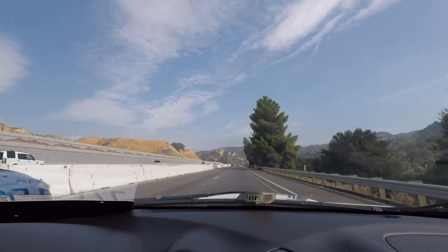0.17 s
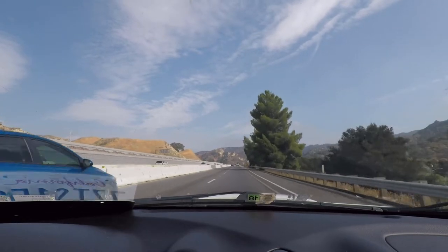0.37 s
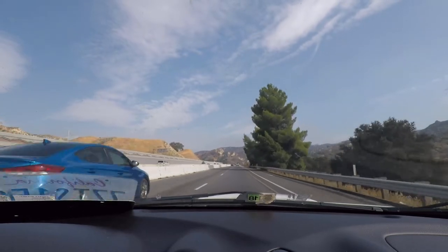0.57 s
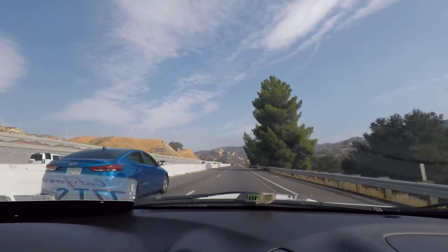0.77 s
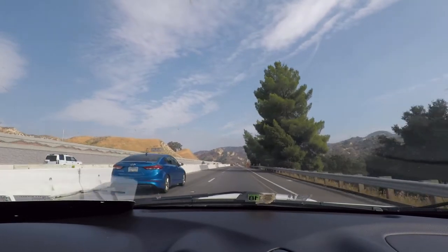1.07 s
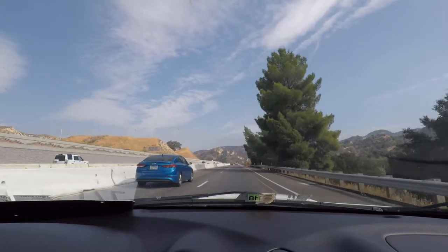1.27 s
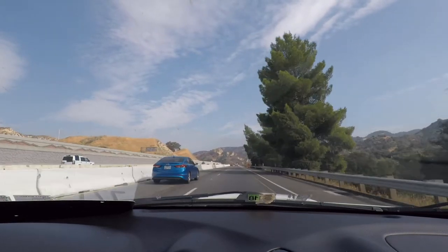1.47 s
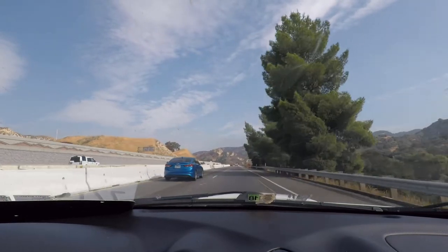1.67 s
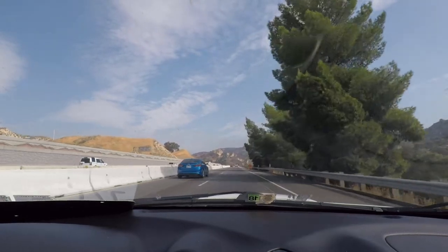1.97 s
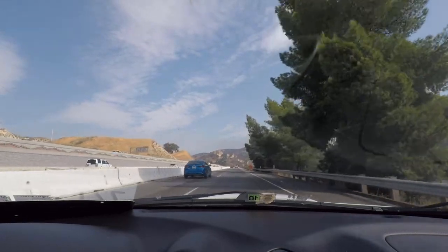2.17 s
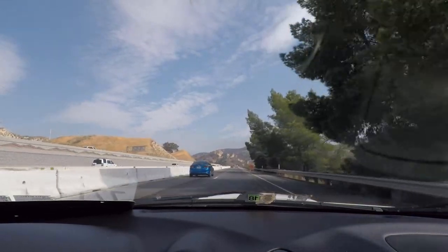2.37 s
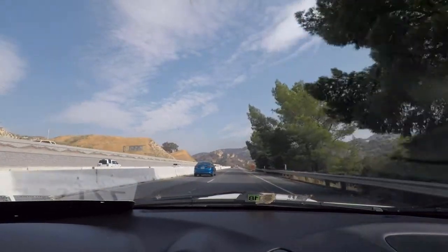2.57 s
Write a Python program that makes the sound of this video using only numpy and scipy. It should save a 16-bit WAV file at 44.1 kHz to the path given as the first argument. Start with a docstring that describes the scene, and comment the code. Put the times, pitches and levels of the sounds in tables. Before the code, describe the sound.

Dragging exhaust rasps and rings in rapid, uneven bursts beneath a car, with low engine drone inside

```python
"""Inside a car on a highway, 2.7 seconds: from the start, sine waves make the engine's drone, and filtered
noise makes the rumble and roar of road and wind, with hollow tones on the right. A loose exhaust pipe
drags on the asphalt: each touch is a burst of random clicks that rasps and rings the steel, and the
ringing carries over the gaps. Dull knocks, fading sine waves, join from 0.4 s. From 0.9 to 1.5 s
a low boom, a gliding sine wave that is only faint before, swells, climbs in pitch and fades."""
import sys
import numpy as np
from scipy import signal
from scipy.fft import rfft, irfft
from scipy.io import wavfile
from scipy.ndimage import uniform_filter1d, minimum_filter1d

SR = 44100
rng = np.random.default_rng(int(sys.argv[2]) if len(sys.argv) > 2 else 0)


def unload_wav(signal):
    """Save mono or channel-first audio to the path in sys.argv[1] as 16-bit WAV at rate SR, clipped to [-1, 1]."""
    wavfile.write(
        sys.argv[1],
        SR,
        np.round(np.clip(np.atleast_2d(signal).T, -1, 1) * 32767).astype(np.int16),
    )


N = 120834
TIME = np.arange(N) / SR  # seconds
FREQS = np.maximum(np.fft.rfftfreq(N, 1 / SR), 1)  # Hz


def from_db(db):
    """Turn decibels into a gain."""
    return 10 ** (np.asarray(db) / 20)


def rms_one(x):
    """Scale a signal to an average power of 1."""
    return x / np.sqrt(np.mean(x ** 2) + 1e-20)


def in_time(rows):
    """Join the table's columns by straight lines in time."""
    seconds, *columns = np.transpose(rows)
    return [np.interp(TIME, seconds, column) for column in columns]


def in_frequency(rows):
    """Join the table's columns by straight lines over log frequency."""
    hz, *columns = np.transpose(rows)
    return [np.interp(np.log(FREQS), np.log(hz), column) for column in columns]


def drift(rate_hz):
    """Smooth random wandering of rms 1; a higher rate wanders faster."""
    step = 40  # samples between the random values
    r = np.exp(-2 * np.pi * rate_hz * step / SR)
    noise = rng.standard_normal(N // step + 2002)
    slow = signal.lfilter([1], [1, -2 * r, r * r], noise)[2000:]  # skip the filter's start-up
    return np.interp(np.arange(N) / step, np.arange(len(slow)), rms_one(slow))


def pan(db):
    """Left and right gains of equal total power; positive dB leans left."""
    gains = from_db(np.vstack([db / 2, -db / 2]))
    return gains / np.sqrt(np.mean(gains ** 2, axis=0))


def widen(mid, side, share):
    """Make left and right from a common and an opposed part."""
    return np.array([mid + share * side, mid - share * side]) / np.sqrt(1 + share ** 2)


def decay_per_sample(t60_s):
    """Factor by which a ring shrinks each sample, to fall 60 dB in t60_s seconds."""
    return np.exp(-np.log(1000) / (t60_s * SR))


def resonate(x, hz, t60_s):
    """Pass sound through one resonance that has a gain of 1 at its top."""
    r = decay_per_sample(t60_s)
    feed = np.array([1, 0, -1]) * (1 - r * r) / 2
    return signal.lfilter(feed, [1, -2 * r * np.cos(2 * np.pi * hz / SR), r * r], x)


MUFFLE_HZ = 1100


def muffle(x):
    """The car's body keeps the treble of low sounds out."""
    lowpass = signal.butter(2, MUFFLE_HZ, fs=SR, output="sos")
    return signal.sosfilt(lowpass, x + 1e-18)


ATTACK_S, RELEASE_S = 0.0037, 0.011
GRAZE_DB = -20  # light force that is always there, also between touches
CHATTER_DB, CHATTER_RATE_HZ = 2.5, 330
# The pipe touches the road. Each row: start in seconds, length in seconds,
# force in dB before the chatter, extra treble of the ringing in dB.
SCRAPES = [(0.0, 0.0043, 1, -1.5), (0.025, .042, 2, -0.5), (0.086, 0.027, 5.5, -1.5),
           (0.166, 0.041, -2.5, 2.5), (0.23, 0.022, -1, 1.5), (0.353, 0.037, -4.5, -3.5),
           (0.418, 0.024, -3.5, -1.5), (0.473, 0.018, -2.5, -1.5), (0.53, 0.045, -1.5, -2.5),
           (0.58, 0.027, -1, -0.5), (0.754, 0.015, -6, -8.5), (0.78, 0.027, -9.5, -6),
           (0.82, 0.034, -1.5, -1.5), (0.861, 0.083, -4.5, -2.5), (0.925, .03, -6, -3.5),
           (0.957, 0.044, -4, 0), (1.03, 0.027, -6.5, 5.5), (1.07, 0.044, 1, -5), (1.118, 0.035, -2, -2.5),
           (1.157, 0.04, -2.5, -4), (1.223, 0.024, -5, -4.5), (1.283, 0.041, -5.5, -4),
           (1.407, 0.029, -1.5, -0.5), (1.443, 0.047, 2.5, -1.5), (1.588, 0.021, 5, 0),
           (1.644, 0.033, 5.5, -1.5), (1.752, 0.028, -0.5, -6), (1.777, 0.038, -6, 5),
           (1.826, 0.042, -3, -2.5), (1.879, 0.014, 4.5, -1.5), (1.978, 0.045, 0, 0.5),
           (2.022, 0.0048, -6, 11), (2.065, 0.053, -2, 0.5), (2.125, 0.0081, 0, -1), (2.144, 0.034, -5, 3),
           (2.197, 0.038, 0, 0.5), (2.242, 0.048, -7.5, 3.5), (2.294, 0.015, -7.5, -0.5),
           (2.336, 0.021, -0.5, -3), (2.469, 0.014, -4, -3), (2.516, 0.031, -6.5, -3.5),
           (2.622, 0.029, 1.5, -0.5), (2.671, 0.01, 1.5, -0.5)]


def contact():
    """Force of the pipe on the road, and the extra treble of the touches weighted by force."""
    force = np.full(N, from_db(GRAZE_DB))
    treble = np.zeros(N)
    for start, length, db, treble_db in SCRAPES:
        age = TIME - start
        attack = np.clip(age / ATTACK_S, 0, 1)
        release = np.exp(-np.maximum(age - length, 0) / RELEASE_S)
        touch = from_db(db) * attack * release
        force = force + touch
        treble = treble + touch * treble_db
    chatter = from_db(CHATTER_DB * (drift(CHATTER_RATE_HZ) - 1.0))
    return force * chatter, treble / force


GRIT_PER_S, GRIT_SPREAD_DB = 3000, 4.7


def grit():
    """Tiny impacts of the asphalt's stones on the steel: clicks of random size, sign and moment."""
    size_db = GRIT_SPREAD_DB * np.minimum(rng.exponential(1, N), 4)
    clicks = from_db(size_db) * rng.choice([-1, 1], N)
    return rms_one(clicks * (rng.random(N) < GRIT_PER_S / SR))


RASP_DB = 45.5  # added to the whole table below
RASP_T60_S, RASP_DIRECT = 0.013, 0.4  # short ring, and share of bare contact noise
COLOUR_DB, COLOUR_OCTAVES, COLOUR_RATE_HZ = 5, 0.7, 9  # wandering bands and how far apart they repeat
# Tone of the bare contact. Each row: frequency in Hz, relative level in dB.
RASP = [(600, -82), (1100, -94.5), (1500, -76), (1900, -83.5), (2700, -83.5), (3100, -86), (4200, -83),
        (5300, -87.5), (6200, -86.5), (7400, -93), (8600, -110), (12800, -120), (15500, -145)]


def rasp(drive):
    """Contact noise and its short ring in many weak steel modes; its colour shifts as the pipe rolls."""
    # fading noise stands for the crowd of modes, different on each side
    crowd = rng.standard_normal((2, N)) * from_db(-60 * TIME / RASP_T60_S)
    response = RASP_DIRECT + rfft(crowd / np.linalg.norm(crowd[0]))
    spectrum = rfft(drive) * response * from_db(RASP_DB + in_frequency(RASP)[0])
    out = 0
    for shift in np.linspace(0, 2 * np.pi, 3, endpoint=False):
        # three interleaved sets of bands that together add up to the whole
        bands = (1 + np.cos(2 * np.pi * np.log2(FREQS) / COLOUR_OCTAVES + shift)) / 3
        colour = rms_one(from_db(COLOUR_DB * drift(COLOUR_RATE_HZ)))
        out = out + irfft(spectrum * bands, N) * colour
    return out


RING_STEADINESS = 0.72  # 0 leaves the swing as it falls, 1 holds it at what the force can sustain
MODE_PHASE_RAD = 1.19  # phase between left and right


def ring_mode(stones, force, hz, t60_s):
    """One pipe mode, fed by grit near its pitch; friction keeps its swing near what the force sustains."""
    # run in for half the length first, so that it already rings at the start
    lead_force = np.full(N - N // 2, np.sqrt(np.mean(force ** 2)))
    force = np.concatenate([lead_force, force])
    stones = np.tile(stones, 2)[N // 2:]
    near_pitch = signal.butter(2, [hz / 1.15, hz * 1.15], "band", fs=SR, output="sos")
    push = signal.sosfilt(near_pitch, stones * force)

    r = decay_per_sample(t60_s)
    feed = 2 * (1 - r)
    swing = signal.lfilter([feed], [1, -r * np.exp(2j * np.pi * hz / SR)], push)[-N:]
    sustained = signal.lfilter([feed ** 2], [1, -r * r], force ** 2)[-N:]
    goal, power = uniform_filter1d(np.array([sustained, np.abs(swing) ** 2]), size=1800, axis=1)
    swing = swing * np.sqrt(np.abs(goal) / (np.abs(power) + 1e-20)) ** RING_STEADINESS

    offset = MODE_PHASE_RAD * rng.choice([-1, 1]) * np.array([[.5], [-.5]])
    phase = 2 * np.pi * rng.random() + offset
    return np.real(swing * np.exp(1j * phase))


RING_DB = 48.5  # added to every mode
MODE_WANDER_DB, MODE_WANDER_RATE_HZ = 3, 9
# extra treble is full this far above the pivot, and reversed as far below it
TREBLE_PIVOT_HZ, TREBLE_OCTAVES = 4240, 0.21
SWELL_WIDTH_HZ = 200  # a swell reaches modes closer than this
# Strong rings swell and fade. Each row: centre in Hz, then a curve of points,
# each point: time in seconds, level change in dB.
RING_SWELLS = [(2620, [(0, 6.5), (.5, 0), (1.1, -2), (1.33, 2.5), (1.6, 0), (2.5, -3)]), (3520, [(0, 4.5),
               (.55, -5.5), (.88, 4), (1.55, -4), (1.9, 9.5), (2.05, -0.5), (2.5, 5)])]
# The ringing tones of the steel pipe. Each row: frequency in Hz, relative level in dB,
# time to fade by 60 dB in seconds, left minus right in dB.
PIPE_MODES = [(1410, -66, .22, -5), (1647, -67, .28, 1), (2567, -70.5, .6, -3), (2643, -62, .6, 1),
              (3520, -71, .22, -3), (3811, -73.5, .15, -1), (3940, -70, .22, -1), (4139, -70, .22, 1),
              (4220, -70.5, .14, 2), (4694, -66, .28, -2), (4914, -74, .15, 4), (4979, -66.5, .2, 5),
              (5485, -76, .13, 8), (5770, -78, .07, 7), (6115, -77, .06, 3), (6573, -74.5, .17, -3),
              (6765, -76, .15, -1), (7132, -76.5, .15, 2), (7262, -78, .13, 7), (7816, -87, .04, 0),
              (9000, -90, .06, -3), (9750, -92.5, .06, 5), (10454, -97, .06, -4), (11181, -98, .06, -3)]


def pipe_ringing(stones, force, treble_db):
    """The steel pipe rings in its own tones, each wandering in how strongly the grit drives it."""
    out = 0
    for hz, db, t60_s, pan_db in PIPE_MODES:
        tilt = np.clip(np.log2(hz / TREBLE_PIVOT_HZ) / TREBLE_OCTAVES, -1, 1)
        swell_db = 0
        for centre_hz, curve in RING_SWELLS:
            if abs(hz - centre_hz) < SWELL_WIDTH_HZ:
                swell_db = swell_db + in_time(curve)[0]
        wander = rms_one(from_db(MODE_WANDER_DB * drift(MODE_WANDER_RATE_HZ)))
        coupling = wander * from_db(RING_DB + db + swell_db + tilt * treble_db)
        out = out + pan(pan_db) * ring_mode(stones, force * coupling, hz, t60_s)
    return out


SCRAPE_WIDTH = 0.18  # share of the rasp's grit that is opposed in left and right


def exhaust():
    """Grit under the contact force rasps on the pipe and makes it ring."""
    force, treble_db = contact()
    stones = grit()
    scrape = rasp(force * widen(stones, grit(), SCRAPE_WIDTH))
    return scrape + pipe_ringing(stones, force, treble_db)


ENGINE_WAVER_DB, ENGINE_WAVER_RATE_HZ = 1.5, 5.2
ENGINE_PAN_DB = -1.2  # left minus right
# Engine speed. Each row: time in seconds, firing rate in Hz.
FIRING = [(0, 67.86), (1.3, 65.96), (2.74, 66.17)]
# Engine loudness. Each row: time in seconds, level in dB.
ENGINE = [(0, -13.5), (.1, -11.5), (.5, -13.5), (.8, -15.5), (1.03, -16.5), (1.16, -23.5), (1.26, -15),
          (1.42, -14.5), (1.55, -11), (1.8, -9.5), (2.2, -11.5), (2.5, -14), (2.74, -11)]
# The engine's tones. Each row: multiple of the firing rate, relative level in dB.
ENGINE_ORDERS = [(1, -10), (2, 0), (3, -14), (4, -28.5), (5, -27.5), (6, -24.5)]


def engine():
    """Sine waves at multiples of the firing rate; all but the second also waver on their own."""
    firing_hz, level_db = in_time(FIRING) + in_time(ENGINE)
    turns = np.cumsum(firing_hz) / SR  # firings so far
    out = 0
    for order, db in ENGINE_ORDERS:
        waver_db = 0 if order == 2 else ENGINE_WAVER_DB
        level = from_db(db + waver_db * drift(ENGINE_WAVER_RATE_HZ))
        out = out + level * np.sin(2 * np.pi * (order * turns + rng.random()))
    return pan(ENGINE_PAN_DB) * np.sqrt(2) * from_db(level_db) * out


ROAR_ABOVE_HZ = 130  # rumble below, roar above
# Tone of road and wind in the cabin, before the level changes.
# Each row: frequency in Hz, level in dB per Hz.
ROAD = [(12, -57.5), (22, -37.5), (30, -28.5), (44, -29), (58, -42), (80, -43), (160, -44), (200, -52),
        (255, -47.5), (350, -49.5), (470, -56), (560, -50.5), (630, -59), (710, -68), (1000, -71.5),
        (1250, -77.5), (3000, -93.5), (6000, -108), (9000, -128), (15500, -150)]
# Left against right. Each row: frequency in Hz, share of opposed sound, left minus right in dB.
CABIN_IMAGE = [(29.8, 0.03, 1.5), (77, 0.025, -4), (300, 0.69, -1), (467, 0.42, 0), (617, 0.23, -12.5),
               (850, 1, -11.5), (1210, 1, -2.5), (2200, 0.49, 1)]
# Level changes. Each row: time in seconds, tyre roar in dB, deep rumble in dB.
ROAR = [(0, 5.5, 0), (.2, 3, -0.5), (.55, 1, 0), (1.15, 3, 1), (1.5, 3.5, -1.5), (2.0, 2, 1.5),
        (2.3, -2, -3), (2.74, -0.5, 0)]


def road():
    """Shaped noise: a deep, evened-out rumble of the body under the slowly changing roar of the tyres."""
    share, pan_db = in_frequency(CABIN_IMAGE)
    mid, side = rfft(rng.standard_normal((2, N)))
    noise = widen(mid, side, share) * pan(pan_db)
    noise = noise * from_db(in_frequency(ROAD)[0]) * np.sqrt(SR / 2)
    low = 1 / (1 + (FREQS / ROAR_ABOVE_HZ) ** 4)
    rumble = irfft(noise * low, N)
    roar = irfft(noise * (1 - low), N)
    swell = np.sqrt(uniform_filter1d(np.mean(rumble ** 2, axis=0), size=4000))
    even_rumble = rumble / rms_one(swell)
    roar_db, rumble_db = in_time(ROAR)
    return from_db(rumble_db) * even_rumble + from_db(roar_db) * roar


HOLLOW_PAN_DB = -9  # left minus right, so it leans right
# Swelling and fading. Each row: time in seconds, level in dB.
HOLLOW = [(0, 8.5), (.15, -0.5), (.4, -8), (.75, -16), (1.1, -3.5), (1.38, -17.5), (1.5, 7), (1.62, 2),
          (1.95, -2), (2.3, 7), (2.38, -30), (2.74, -8)]
# The hollow tones. Each row: frequency in Hz, relative level in dB at the top,
# time to fade by 60 dB in seconds.
HOLLOW_MODES = [(549.5, -49.5, 0.36), (546, -50.5, 0.19), (571, -49.5, 0.68)]


def hollow():
    """Road noise swells and fades in a few hollow resonances, louder on the right."""
    noise = muffle(rng.standard_normal(N)) * np.sqrt(SR / 2) * from_db(in_time(HOLLOW)[0])
    tones = sum(from_db(db) * resonate(noise, hz, t60_s) for hz, db, t60_s in HOLLOW_MODES)
    return pan(HOLLOW_PAN_DB) * tones


# The gliding boom; the first and last values hold outside these times.
# Each row: time in seconds, frequency in Hz, level in dB.
BOOM = [(.92, 40.32, -27.5), (1.06, 43.84, -14.5), (1.22, 64.3, -16), (1.38, 72.5, -16), (1.48, 71, -37)]


def boom():
    """A low boom in the cabin: one sine wave that glides in pitch and level."""
    hz, db = in_time(BOOM)
    turns = np.cumsum(hz) / SR + rng.random()
    return np.sqrt(2) * from_db(db) * np.sin(2 * np.pi * turns)


KNOCK_HZ, KNOCK_T60_S = 548, 0.069
# Dull knocks. Each row: start in seconds, starting level in dB before muffling and panning.
KNOCKS = [(.375, -17), (.838, -16.5), (1.497, -11), (1.677, -13), (1.878, -14.5)]


def knocks():
    """Hard landings thump the hollow body of the exhaust: fading sine waves, louder on the right."""
    out = 0
    for start, db in KNOCKS:
        age = np.maximum(TIME - start, 0)  # zero, so silent, before the start
        fade = from_db(db - 60 * age / KNOCK_T60_S)
        out = out + fade * np.sin(2 * np.pi * KNOCK_HZ * age)
    return pan(HOLLOW_PAN_DB) * muffle(out)


def scene():
    """Add up everything heard in the cabin, in stereo."""
    return exhaust() + engine() + road() + hollow() + boom() + knocks()


LIMIT_DB, LIMIT_RELEASE_DB_PER_S = -2.5, 64
CUTOFF_HZ = 15700


def record(dry):
    """A limiter holds the peaks down and lets go slowly, then the top of the treble is cut."""
    peak_db = 20 * np.log10(np.abs(dry).max(axis=0) + 1e-9)
    over_db = np.maximum(peak_db - LIMIT_DB, 0)
    ramp_db = LIMIT_RELEASE_DB_PER_S * TIME
    gain_db = ramp_db - np.maximum.accumulate(over_db + ramp_db)
    # turn down a little ahead of each peak, and smoothly
    gain_db = minimum_filter1d(gain_db, size=300)
    gain_db = uniform_filter1d(uniform_filter1d(gain_db, size=200), size=200)
    treble_cut = signal.cheby2(12, 70, CUTOFF_HZ, fs=SR, output="sos")
    return signal.sosfilt(treble_cut, dry * from_db(gain_db))


dry = scene()
out = record(dry)
unload_wav(out)
```